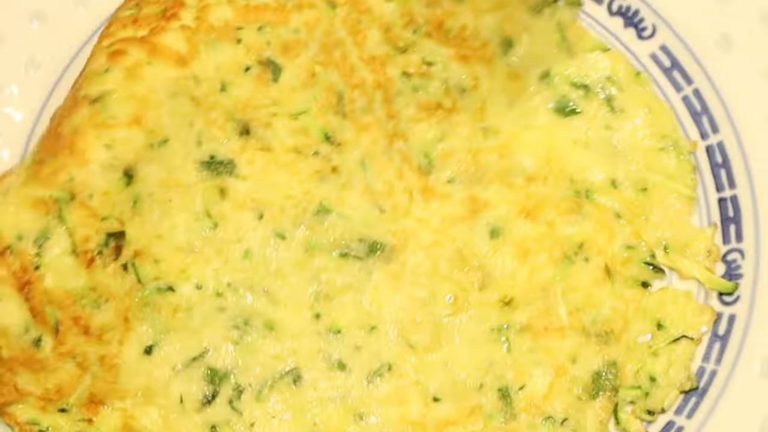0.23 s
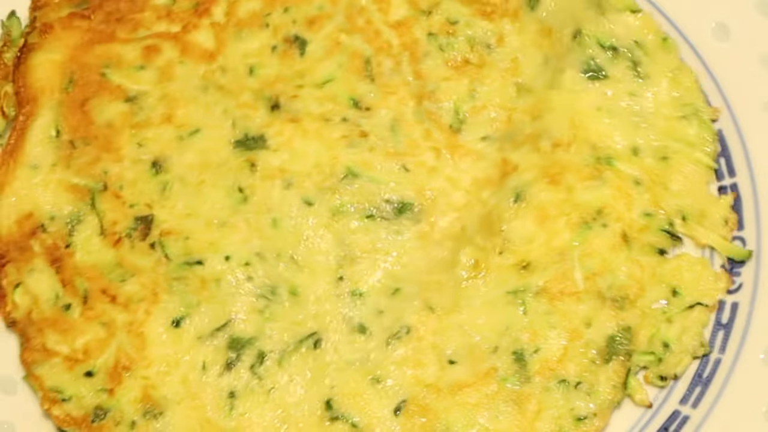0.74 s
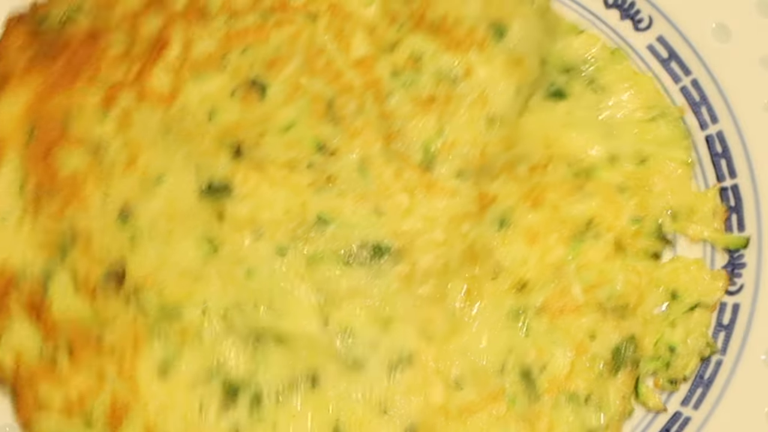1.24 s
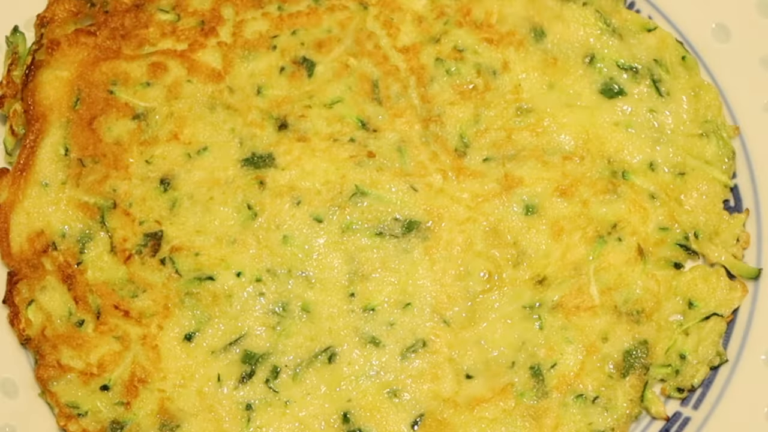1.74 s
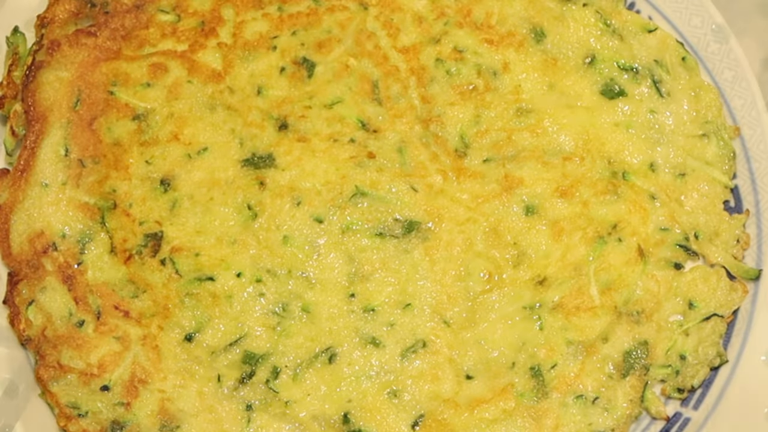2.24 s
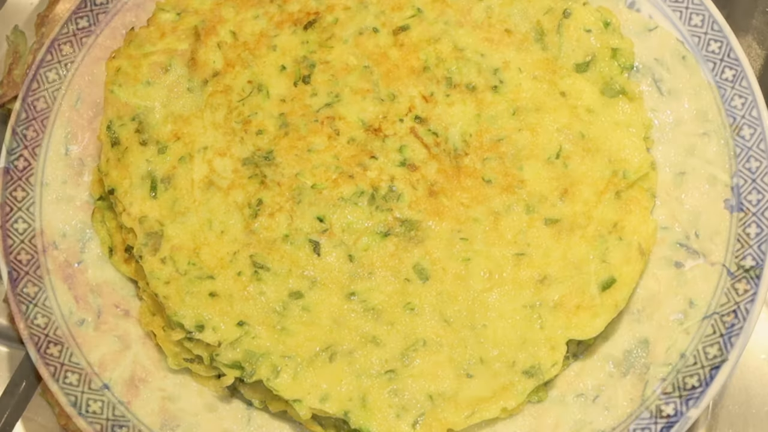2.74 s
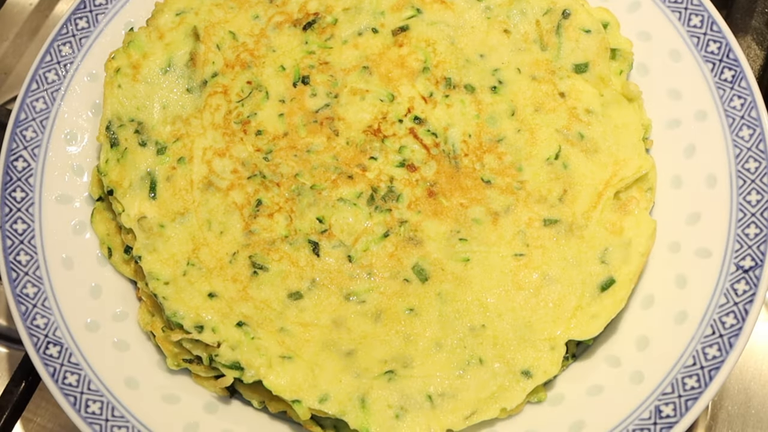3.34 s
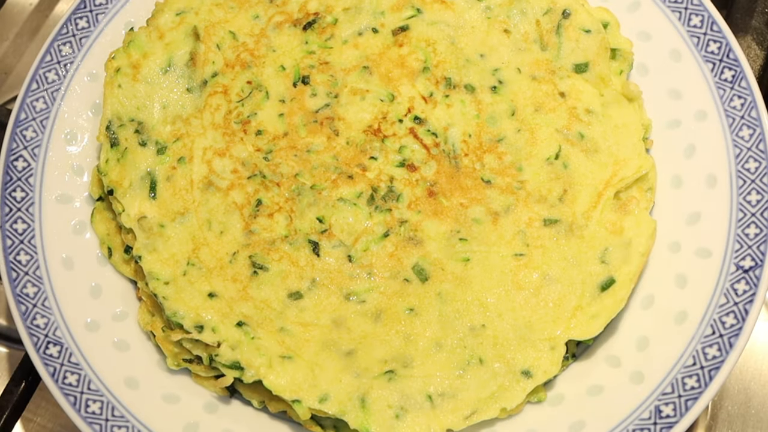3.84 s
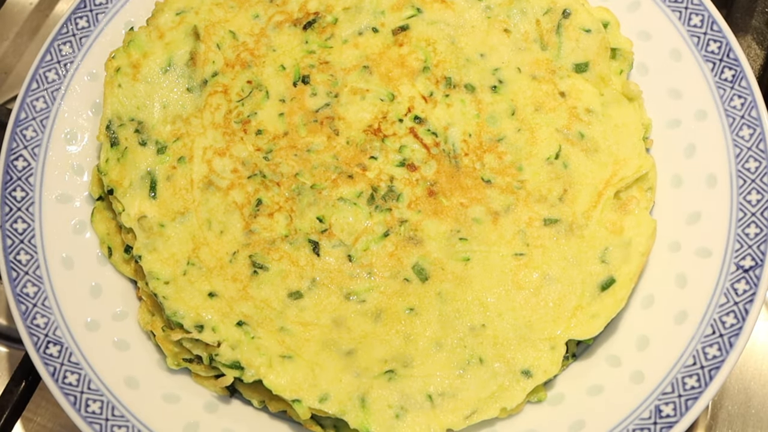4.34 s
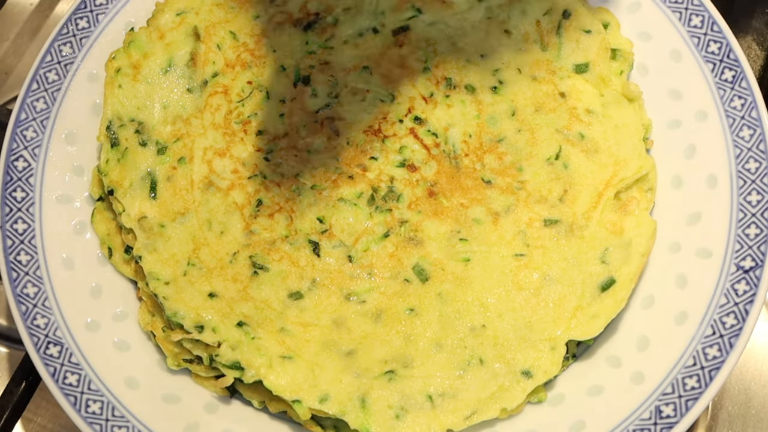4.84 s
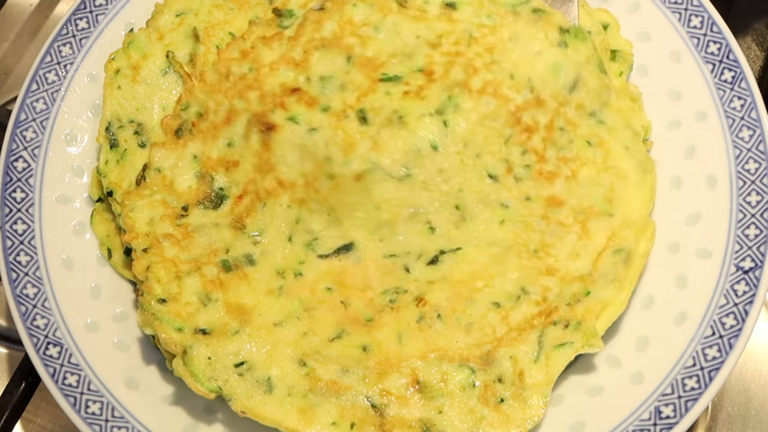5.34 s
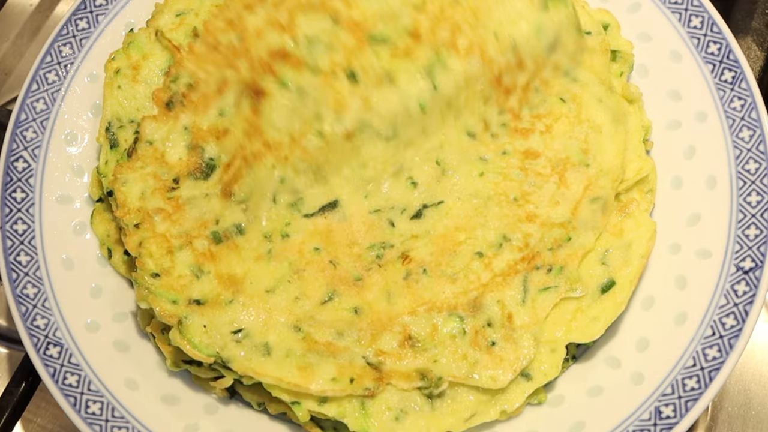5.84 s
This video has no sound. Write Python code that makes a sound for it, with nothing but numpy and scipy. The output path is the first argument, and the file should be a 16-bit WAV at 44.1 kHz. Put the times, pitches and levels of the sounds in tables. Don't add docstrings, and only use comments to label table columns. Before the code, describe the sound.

Close stereo pickup with a short room echo: metal blade on crockery, gritty and bright, with tiny chirps, ticks and a final hard scrape that rings away. Quiet follows, with a faint far creak. Then oil spits and bubbles, a heavy pan clanks and rocks on its grate, and the frying slowly dries up. Finally a soft wet mass smacks onto a plate, with a low thump beneath, leaving faint bubbling.

```python
import sys
import numpy as np
from scipy import signal
from scipy.fft import rfft, irfft, next_fast_len
from scipy.io import wavfile
from scipy.ndimage import uniform_filter1d, map_coordinates

SR = 44100
rng = np.random.default_rng(int(sys.argv[2]) if len(sys.argv) > 2 else 0)


def invert_db(level):
    return 10 ** (np.asarray(level, dtype=float) / 20)


def persist_wave(psi):
    counts = np.round(np.clip(psi, -1, 1) * 32767).astype(np.int16)
    wavfile.write(sys.argv[1], SR, np.atleast_2d(counts).T)


N = 268646
TIME = np.arange(N) / SR

BLADE_GROUPS = (2430, 4500, 9000)
# pitch in Hz, width in Hz, level in dB.
BLADE_PRESSED = [(2470, 240, 1.5), (3506, 250, -5), (4150, 70, -9.5), (5110, 60, -5.5), (5360, 92, -5),
                 (6500, 150, -7.5), (7000, 100, -9.5), (7320, 26, -6.5), (7810, 21, -7.5), (8940, 140, -10),
                 (10160, 150, -7.5), (11773, 570, -12.5), (13000, 260, -14.5), (15020, 165, -17)]
# pitch in Hz, width in Hz.
BLADE_VALLEYS = [(4650, 150), (6080, 350), (8350, 200), (9400, 450), (10850, 250), (13600, 300)]
# start in seconds, length in seconds, level in dB, low modes in dB, top modes in dB relative to it.
STROKES = [
    (0.403, 0.1, -58.5, 10, -5),
    (0.467, 0.15, -63, -3, -12),
    (0.542, 0.088, -50, -10, -14),
    (0.626, 0.048, -40.5, -5.5, -7.5),
    (0.955, 0.115, -54, -8.5, -9),
    (1.083, 0.13, -46.5, -4, -1),
    (1.5, .04, -70, -4, -3),
    (1.2185, 0.12, -46.5, -1, -3.5),
    (1.325, 0.14, -47, -2, -4),
    (0.046, 0.072, -58.5, 15.5, 6),
]
# start in seconds, length in seconds, level in dB, low modes in dB, top modes in dB relative to it.
JOLTS = [
    (0., 0.055, -56.5, -2, -5.5),
    (0.09, 0.73, -60.5, 14, -1),
    (0.65, 0.27, -51.5, -26, -11),
    (1.411, 0.11, -42.5, 2, 8),
    (1.506, 0.03, -50.5, 7.5, 6),
]
# peak time in seconds, level in dB, fall in dB per second.
SCUFFS = [
    (.018, -52, 150),
    (.06, -59.5, 170),
    (.645, -57.5, 226),
    (1.158, -53.5, 500),
    (1.425, -49, 300),
    (1.515, -52, 330),
]
# start in seconds, peak in dB, tilt in dB per octave.
TICKS = [(0.0136, -36, -13), (.021, -49, -5), (.034, -45, -9), (0.045, -47, -12), (.422, -65, 3.5),
         (0.438, -52.5, 2.5), (.495, -47, 0.5), (.578, -46, -2.5), (0.593, -43.5, 3), (.626, -51.5, -4),
         (.9512, -66, -10), (.979, -54.5, -2.5), (.996, -47, 6), (1.086, -52.5, -4.5), (1.156, -34, -0.5),
         (1.161, -39, 3), (1.234, -42, 1.5), (1.263, -43.5, -3.5), (1.303, -41.5, 0), (1.346, -51, 3),
         (1.377, -44.5, 1.5), (1.4175, -27.5, 1.5), (1.425, -33, 2.5), (1.4295, -28, 0.5), (1.432, -35, 0),
         (1.497, -41.5, -3.5), (1.5065, -31.5, -6), (1.517, -37.5, 2)]
# start in seconds, peak in dB, length in ms.
SLIPS = [(0.4226, -42.5, 3.5), (0.428, -44, 1.7), (0.432, -52.5, 3), (0.438, -41, 2.4), (0.4418, -34, 2.3),
         (0.4466, -42.5, 2.6), (0.47, -45, 3.4), (0.488, -43.5, 2.4), (0.493, -45.5, 3.6), (.51, -56, 3.5),
         (0.5273, -46, 4), (0.539, -43.5, 2.3), (0.5473, -31.5, 5.4), (0.55, -42.5, 4.6),
         (0.5557, -46.5, 4.4), (0.5669, -43.5, 3.1), (0.5714, -46.5, 3.5), (0.5776, -34, 5.1),
         (0.5837, -37.5, 2.2), (1.4166, -32, 3.5), (1.4305, -39, 1.9), (1.439, -34.5, 1.9),
         (1.4449, -31, 2.5), (1.45, -39.5, 4.4), (1.4717, -35.5, 5)]
# start in seconds, peak in dB, pitch in Hz.
BITES = [
    (0.637, -42, 5450),
    (0.643, -37, 5420),
    (.652, -42.5, 5440),
    (0.657, -49.5, 5310),
    (0.9512, -65, 5110),
    (0.9785, -54, 3440),
    (1.088, -40.5, 5360),
    (1.156, -43, 4150),
    (1.418, -32.5, 4970),
    (1.5045, -41, 3600),
]
# start in seconds, peak in dB, pitch in Hz, length in ms.
PLATE_NUDGES = [
    (0.015, -38.5, 900, 1.5),
    (0.02, -53, 940, 3.7),
    (0.035, -40, 920, 2.1),
    (0.593, -48, 1060, 1.6),
    (0.598, -67, 816, 20),
    (1.304, -64.5, 830, 5.5),
    (1.439, -49.5, 1115, 5.7),
    (1.482, -51.5, 1077, 7.4),
]
# pitch in Hz, width in Hz, level in dB.
PLATE_HUM = [(720, 90, 0.5), (790, 40, -4.5), (1760, 200, 3)]
# start in seconds, level in dB under 300 Hz, near 700 Hz, near 2 kHz
# and above 4 kHz, contact in ms.
TAPS = [
    (.072, -61, -36, -35, -64, 20),
    (.652, -60, -36.5, -50.5, -62, 8.2),
    (1.507, -38.5, -28, -41, -45.5, 26.6),
]
# pitch in Hz, level in dB, time to fade 60 dB in seconds.
BLADE_FREE = [(720, -15, 0.29), (671, -8.5, 0.078), (238, -28.5, 0.74), (2054, -7, 0.91),
              (2332, -11.5, 0.63), (2690, -12.5, 0.082), (2837, 1, 0.17), (3714, 1, 0.24), (5100, 7, 0.07),
              (6160, -1, .09), (7000, -7.5, 0.12), (7670, -16.5, .17), (12770, -10, 0.2),
              (13910, -10.5, 0.1)]
# start in seconds, level in dB under 300 Hz, near 700 Hz, near 2 kHz
# and above 4 kHz, contact in ms.
DABS = [
    (.0135, -81, -55, -57, -61, 1.2),
    (.0205, -66, -57, -54, -74, 1),
    (.0335, -67, -47.5, -52, -69.5, 1.9),
    (.8162, -45, -44.5, -44.5, -44.5, 0.3),
]
# pitch in Hz, level in dB, time to fade 60 dB in seconds.
BLADE_DOWN = [(197, -14, 0.18), (674, 0.5, 0.13), (844, -1.5, 0.15), (1257, -28, 0.11), (1600, -8.5, 0.033),
              (1830, -6.5, 0.049), (2360, 3.5, 0.092), (3420, 4, 0.023), (5300, -7, 0.084),
              (7100, -12.5, 0.037)]
# start in seconds, level in dB under 300 Hz, near 700 Hz, near 2 kHz
# and above 4 kHz, contact in ms.
DROPS = [
    (.63, -60, -36.5, -33, -66.5, 36),
    (.654, -49.5, -32, -44, -63.5, 15),
]
# pitch in Hz, level in dB, time to fade 60 dB in seconds.
PLATE_LOADED = [(186, -8.5, 0.54), (246, -5, 0.29), (329, -5.5, 0.32), (483, -11.5, 0.28),
                (626, -10.5, 0.22), (708, -3, 0.29), (761, -12.5, 0.32), (880, -12.5, 0.067),
                (1148, -14.5, .15)]
# start in seconds, level in dB under 300 Hz, near 700 Hz, near 2 kHz
# and above 4 kHz, contact in ms.
SPRINGS = [
    (.045, -90, -88.5, -53, -49.5, 25.2),
]
# pitch in Hz, level in dB, time to fade 60 dB in seconds.
SHIMMER = [(4200, -12, .35), (5600, -3.5, 0.22), (7380, -7, .12), (9240, 0, 0.16), (9900, -6, .12),
           (11070, -15.5, .15), (12900, 3, .14), (13340, 3, .14), (12770, -11, .4), (15230, -2.5, .1),
           (15700, -14.5, .1)]

# pitch in Hz, level in dB per Hz.
HUSH = [(30, -44.5), (214, -6.5), (700, -27), (1080, -40.5), (2500, -34), (6770, -21), (7320, -24),
        (15600, -23.5)]
# pitch in Hz, width in Hz, level in dB.
HOLLOW_MODES = [(520, 130, 0), (640, 70, 0)]
# peak time in seconds, level in dB, fall in dB per second, pitch in Hz.
CREAKS = [
    (1.916, -79.5, 397.5, 1423),
    (2.05, -74, 178.5, 1359),
]

# peak time in seconds, level in dB, fall in dB per second.
BOOMS = [
    (.645, -58, 99),
    (1.53, -64, 259),
    (2.89, -51, 171.5),
    (3.27, -74.5, 28),
    (4.43, -63, 133),
    (5.122, -33.5, 337),
    (5.15, -67.5, 76),
    (5.778, -70, 32),
]
# peak time in seconds, level in dB, fall in dB per second.
PUSHES = [
    (.114, -57.5, 352),
    (2.39, -72.5, 110),
    (2.69, -63.5, 402),
    (3.92, -69.5, 250),
    (4.18, -65, 334),
    (4.88, -76, 150),
    (5.55, -76, 149.2),
]
# pitch in Hz, width in Hz, level in dB.
COUNTER_MODES = [(98, 30, -25), (157, 120, -6), (210, 55, 5), (299, 120, -10.5)]

# time in seconds, bubbling in dB.
FRY = [(2.15, -109), (2.28, -77), (2.394, -67.5), (2.75, -50.5), (2.95, -51), (3.3, -53), (3.43, -56.5),
       (3.76, -53.5), (3.84, -56.5), (4.21, -57), (4.74, -62.5), (4.81, -65), (5.06, -65), (5.38, -74.5),
       (5.45, -64.5), (5.86, -71.5), (6.09, -71)]
# pitch in Hz, level in dB per Hz.
FRY_COLOUR = [(1500, -30.5), (2000, -9), (2750, -10), (3610, 1.5), (4090, 4.5), (7240, -0.5), (10200, -9.5),
              (15600, -12)]
# peak time in seconds, bubbling in dB, spray in dB, fall in dB per second.
FLARES = [
    (3.369, -50.5, -49.5, 159),
    (4.249, -56, -62, 157),
    (4.36, -61.5, -73.5, 51),
    (4.87, -58.5, -73, 358),
    (5.17, -63.5, -80, 49.5),
    (5.93, -56, -70, 71),
    (6.011, -71.5, -71.5, 156.5),
]
# start in seconds, peak in dB, pitch in Hz, cycles.
BUBBLES = [
    (4.148, -46, 3240, 25.4),
    (4.7093, -54.5, 5230, 34),
    (4.8616, -47, 5400, 68),
    (4.971, -47.5, 4020, 25),
    (5.261, -58.5, 4170, 68),
    (5.9332, -36, 3720, 11),
]
# start in seconds, peak in dB, pitch in Hz, cycles.
SPITS = [
    (3.0402, -36, 7000, 2.2),
    (3.3564, -35.5, 10500, 2.5),
    (3.363, -26.5, 10500, 2.8),
    (2.742, -38.5, 11000, 2.9),
    (4.097, -38, 6000, 7.2),
    (4.116, -33, 9000, 2.5),
    (4.3625, -40.5, 11000, 3),
    (5.4575, -45.5, 12000, 13.5),
]
# start in seconds, peak in dB, centre in Hz, fade in ms.
SPLUTTERS = [(3.12, -42, 3000, 27), (3.3, -45, 4000, 31), (2.689, -48, 3300, 60), (3.678, -44, 7000, 31),
             (3.705, -45, 8350, 21), (3.85, -43.5, 12100, 24), (3.883, -45, 11100, 14),
             (3.907, -45.5, 4120, 44), (3.973, -41.5, 7400, 15), (4.0356, -39.5, 4760, 58),
             (4.116, -41, 7500, 13.4), (4.148, -42, 3260, 24), (4.179, -37, 4760, 15.3),
             (4.24, -49, 11370, 12), (4.3193, -38, 4300, 28), (4.329, -44.5, 7000, 12),
             (4.417, -41.5, 5300, 52), (4.419, -48.5, 7300, 63), (4.489, -48.5, 4000, 110),
             (4.54, -47, 5230, 14.5), (4.584, -50, 3035, 45), (4.617, -43, 4100, 88),
             (4.629, -51.5, 2500, 36), (4.7073, -36.5, 5100, 23), (4.817, -48, 2500, 22.5),
             (5.93, -46.5, 3650, 100), (3.71, -52, 13600, 23), (4.361, -47, 13000, 11),
             (4.472, -50.5, 13000, 25), (4.86, -50.5, 6500, 24), (5.971, -49.5, 6060, 40),
             (6.01, -49, 4330, 27)]

# time in seconds, level in dB.
SHUFFLE = [(2.2, -120), (2.26, -85), (2.35, -68), (2.5, -73.5), (2.84, -67), (3.08, -64), (3.23, -75.5),
           (3.8, -67.5), (4.24, -76.5), (5.05, -74.5), (5.36, -76.5), (6.09, -76)]
# pitch in Hz, width in Hz, level in dB.
SHUFFLE_MODES = [
    [(484, 66, -5), (578, 87, 4.5), (756, 56, -4)],
    [(1022, 110, 12.5), (1110, 34, 0)],
    [(1780, 130, -5), (1930, 640, 10)],
]
# peak time in seconds, level in dB, fall in dB per second.
SKIDS = [
    (3.77, -57.5, 129),
]
# start in seconds, peak in dB, pitch in Hz, length in ms.
ROCKS = [
    (2.699, -53.5, 652, 22),
    (3.708, -50.5, 684, 12.4),
    (3.813, -38.5, 657, 15.5),
    (3.871, -44.5, 750, 4.4),
    (3.945, -44, 677, 13),
    (4.013, -44, 652, 11),
    (4.409, -42, 1070, 10),
    (4.424, -44, 1060, 15),
    (4.445, -41, 674, 8.9),
    (4.456, -47.5, 668, 6.5),
]
# start in seconds, level in dB under 300 Hz, near 700 Hz, near 2 kHz
# and above 4 kHz, contact in ms.
KNOCKS = [
    (2.272, -87, -74.5, -82, -75, 2.4),
    (2.864, -52, -18.5, -27, -28, 1),
    (2.931, -31, -49, -43.5, -51.5, 17),
]
# pitch in Hz, level in dB, time to fade 60 dB in seconds.
SKILLET = [(605.4, 4, 0.1), (623, 8.5, 0.11), (721, 2.5, 0.079), (950, -5, 0.075), (1018.5, -5.5, 0.082),
           (787, -8, 0.11), (1116, -8.5, 0.23), (1510, -6, 0.035), (1677, -13.5, 0.52), (1786, -7.5, 0.27),
           (1886, 5, 0.098), (2060, -8.5, 0.29), (2470, -9.5, .1), (2924, -4, 0.11)]
# start in seconds, level in dB under 300 Hz, near 700 Hz, near 2 kHz
# and above 4 kHz, contact in ms.
RIM_KNOCKS = [
    (2.864, -89, -59.5, -46, -38.5, 1.3),
]
# pitch in Hz, level in dB, time to fade 60 dB in seconds.
SKILLET_RIM = [(4100, 1.5, 0.1507), (3990, 0.5, 0.19), (3990, -1.5, 0.2), (4420, -4.5, 0.19),
               (4560, -3, 0.17), (4678, -5, 0.39), (5460, -3, 0.16), (7300, -6, 0.075)]
# start in seconds, level in dB under 300 Hz, near 700 Hz, near 2 kHz
# and above 4 kHz, contact in ms.
GRATE_BUMPS = [
    (2.336, -57, -51, -61.5, -58, 33.5),
]
# pitch in Hz, level in dB, time to fade 60 dB in seconds.
GRATE = [(306.4, -0.5, 0.65), (688.2, -2, 0.69), (970, 6.5, 0.17), (1933, 6.5, 0.29)]

# start in seconds, level in dB under 300 Hz, near 700 Hz, near 2 kHz
# and above 4 kHz, contact in ms.
SLAPS = [
    (5.064, -89, -52.5, -38.5, -46.5, 11),
    (5.083, -71.5, -36, -25.5, -32, 4.3),
    (5.108, -20.5, -32, -39, -42, 30),
]
# pitch in Hz, level in dB, time to fade 60 dB in seconds.
PLATE = [(222.6, -15, 0.2), (435.7, -17, 0.13), (628, -2, 0.38), (846, 1.5, 0.074), (1060, -26, 0.201),
         (1620, -22, 0.12), (1960, -20, 0.08), (2500, -17, 0.062)]
# pitch in Hz, level in dB per Hz.
SLAP_AIR = [(88, -47.5), (150, -14.5), (1570, -1.5), (2650, -34.5), (3910, -21), (6110, -28), (9000, -30),
            (15500, -38.5)]
# start in seconds, peak in dB, fade in ms.
SLAP_CRACKS = [
    (5.071, -46, 4.6),
    (5.081, -28.5, 5.87),
    (5.086, -19.5, 4.2),
    (5.091, -22.5, 7),
    (5.105, -27, 4.38),
]
# time in seconds, left over right in dB.
SLAP_PAN = [
    (5.07, -8.5),
    (5.1, 15),
    (5.125, 8.5),
    (5.2, 17),
]
# pitch in Hz, time to fade 60 dB in seconds.
ROOM_T60 = [(200, .45), (1500, 0.26), (12000, 0.056)]


def unit(x):
    return x / np.sqrt(np.mean(x ** 2))


def steady(x, seconds):
    return x / np.sqrt(uniform_filter1d(x ** 2, int(seconds * SR)) + 1e-12)


def on_log(hz, table):
    points, values = np.transpose(table)
    return np.interp(np.log(hz), np.log(points), values)


def curve(table):
    return np.interp(TIME, *np.transpose(table))


def colour(x, table):
    size = next_fast_len(len(x))
    gain = invert_db(on_log(np.fft.rfftfreq(size, 1 / SR) + 1, table))
    return irfft(rfft(x, size) * gain, size)[:len(x)]


def high_pass(x, order, hz):
    return signal.sosfilt(signal.butter(order, hz, "high", fs=SR, output="sos"), x)


def resonate(x, hz, width):
    return signal.lfilter(*signal.iirpeak(hz, hz / width, SR), x)


def walk(rate):
    k = int(SR / rate)
    held = np.repeat(rng.standard_normal(N // k + 1), k)
    return 0.88 * uniform_filter1d(uniform_filter1d(held, k), k)[:N]


def bend(x, share, rate=11):
    return map_coordinates(x, [np.arange(N) + np.cumsum(share * walk(rate))], mode="mirror")


def grit(rate, spread_db):
    size = invert_db(spread_db * rng.exponential(size=N)) * rng.standard_normal(N)
    return unit(size * (rng.random(N) < rate / SR))


def add(out, s, sound):
    i = int(s * SR)
    out[i:i + len(sound)] += sound[:N - i]


def place(x, pan_db):
    left = invert_db(pan_db)
    return 2 * x * np.array([left + 0 * x, 1 + 0 * x]) / (1 + left)


def swells(events, rise_db_s, under_db):
    peaks = [db - np.where(TIME < s, rise_db_s * (s - TIME), fall * (TIME - s)) for s, db, fall in events]
    return np.max(peaks + [under_db + 0 * TIME], axis=0)


def shake(contact, modes, skirt, patchy_db):
    out = 0
    for hz, width, db in modes:
        mode = unit(resonate(resonate(contact, hz, skirt * width), hz, width))
        out = out + invert_db(db + patchy_db * walk(14)) * mode
    return steady(out, 0.1)


def strike(blows, modes, rattle_db, rattle_s, beat_hz, depth, cut_hz=190):
    out, t = np.zeros(N), TIME[:SR // 2, None]
    hz, db, t60 = np.transpose(modes)
    for s, low_db, body_db, mid_db, top_db, ms in blows:
        gain = invert_db(db + on_log(hz, [(280, low_db), (700, body_db), (2100, mid_db), (3500, top_db)]))
        rise = (1 - np.exp(-t * 4000 / ms)) ** 2
        phase, apart = rng.random((2, len(hz)))
        waver = 1 + depth * np.cos(2 * np.pi * beat_hz * (.5 + apart) * t)
        tones = np.sin(2 * np.pi * (hz * t + 0.18 * phase + np.arange(len(hz)) / 2))
        ring = rise * gain * waver * tones * 1000. ** (-t / t60)
        rattle_colour = [(150, low_db - 24.5), (700, body_db), (2100, mid_db - 5),
                         (5000, top_db - 15.0), (15000, top_db - 52.0)]
        rattle = unit(colour(rng.standard_normal(len(t)), rattle_colour))
        fade = (rise * 1000. ** (-t / (rattle_s + ms / 300)))[:, 0]
        add(out, s, ring.sum(1) + invert_db(max(body_db, mid_db) + rattle_db) * rattle * fade)
    return high_pass(out, 8, cut_hz)


def blips(events, glide):
    out = np.zeros(N)
    for s, db, hz, seconds in events:
        u = np.linspace(0, 1, int(seconds * SR) + 2)
        tone = np.sin(2 * np.pi * hz * seconds * (u + glide * u ** 2 / 2))
        add(out, s - .001, invert_db(db) * np.sin(np.pi * np.sqrt(u)) ** 2 * tone)
    return out


def kitchen(x, wet_db, pan_db):
    t, echo = TIME[:SR // 2], 0
    for hz in 125 * 2. ** np.arange(8):
        noise = resonate(rng.standard_normal((2, len(t))), hz, hz * 0.46)
        echo = echo + noise * 1000. ** (-t / on_log(hz, ROOM_T60)) * (1 - np.exp(-t / 0.003))
    echo = echo / np.sqrt(np.sum(echo ** 2) / 2)
    shared, apart = invert_db(wet_db) * signal.fftconvolve(x[None], echo, axes=1)[:, :N]
    return place(x + shared, pan_db) + colour(apart, [(2000, -15.5), (12000, -1.5)]) * np.array([[1], [-1]])


def dragging():
    land_s, lift_s = 0.0065, 0.029
    levels = np.full((3, N), -110.)
    shapes = [(row, row[1] * 0.51, -8.5, [-28] * 3) for row in STROKES]
    shapes += [(row, 0.008, -1, -row[1] * np.array((134.5, 192, 297))) for row in JOLTS]
    for (s, length, db, low_db, top_db), rise_s, start_db, ends_db in shapes:
        times = [-land_s, 0, rise_s, length, length + lift_s]
        for level, share_db, end_db in zip(levels, (low_db, 0, top_db), ends_db):
            shape = np.interp(TIME - s, times, [-40, start_db, 0, end_db, end_db - 35], -99, -99)
            add(level, 0, np.maximum(db + share_db + shape - level, 0))
    return levels


def chatter(levels):
    nearest = [np.argmin(abs(np.log(row[0] / np.array(BLADE_GROUPS)))) for row in BLADE_PRESSED]
    out = 0
    for group, db in enumerate(levels):
        contact = grit(7000, 1.8) * invert_db(3.5 * walk(70))
        modes = [row for row, k in zip(BLADE_PRESSED, nearest) if k == group]
        out = out + bend(shake(contact, modes, 3, 6), .012) * invert_db(db - 3.0)
    return out


def ticks():
    out, t = np.zeros(N), TIME[:SR // 20, None]
    hz, width, db = np.transpose(BLADE_PRESSED)
    damping, crack_s, crack_db = 1.4, .0008, -13
    for s, peak_db, tilt_db in TICKS:
        mix_db = db + tilt_db * 2 * np.log2(hz / 4000) + 4 * rng.standard_normal(len(hz))
        ring = (invert_db(mix_db) * np.sin(2 * np.pi * hz * t) * np.exp(-np.pi * damping * width * t)).sum(1)
        crack = rng.standard_normal(len(t)) * np.exp(-t[:, 0] / crack_s)
        add(out, s, invert_db(peak_db) * (ring / abs(ring).max() + invert_db(crack_db) * resonate(crack, 6000, 8000)))
    return out


def scrape():
    levels = dragging()
    scuff = grit(9000, 1.8)
    rasp = unit(colour(scuff, [(1500, -30.0), (3000, 4.0), (8000, 1), (15000, -7.5)]))
    rasp = rasp * invert_db(swells(SCUFFS, 500, levels[2] - 17))
    scraped = high_pass(chatter(levels) + rasp + ticks(), 4, 1750)
    for hz, width in BLADE_VALLEYS:
        scraped = scraped - resonate(scraped, hz, width)
    return scraped + shake(scuff, PLATE_HUM, 2.2, 4) * invert_db(levels[1] - 27)


def slips():
    events = [(s, db, 2402, ms) for s, db, ms in SLIPS] + PLATE_NUDGES + [(*row, 2.1) for row in BITES]
    return blips([(s, db, hz, 3.1 * ms / 1000) for s, db, hz, ms in events], 0)


def free_ring():
    pressed = uniform_filter1d(1. * (TIME > .814) * (TIME < 1.503), size=200)
    held_db = -16 * pressed - 118.5 * np.maximum(TIME - 1.546, 0)
    return strike(TAPS, BLADE_FREE, -11.0, 0.0054, 16, 0.04) * invert_db(held_db)


def spatula():
    dabs = strike(DABS, BLADE_DOWN, -2, 0.071, 27, 0.24)
    drops = strike(DROPS, PLATE_LOADED, -16, 0.0497, 10.0, 0.2, cut_hz=110)
    springs = strike(SPRINGS, SHIMMER, -11.5, .05, 30, .3)
    return scrape() + slips() + free_ring() + dabs + drops + springs


def background():
    hush = invert_db(-90) * np.array([unit(colour(rng.standard_normal(N), HUSH)) for _ in range(2)])
    hollow_db = -76.5 - 8 * TIME - 50 * np.maximum(TIME - 1.82, 0)
    hollow = invert_db(np.maximum(hollow_db, -100)) * shake(rng.standard_normal(N), HOLLOW_MODES, 1.0, 2.9)
    wobble = 1 + 0.48 * unit(resonate(rng.standard_normal(N), 53, 50))
    creak, sag_hz_s = 0, 198.6
    for s, db, fall, hz in CREAKS:
        since = TIME - s
        phase = 2 * np.pi * (hz - sag_hz_s * since / 2) * since + 1.7 * walk(70)
        creak = creak + invert_db(swells([(s, db, fall)], 311, -150)) * np.sin(phase)
    apart = 0.39 * hush[1] * np.array([[1], [-1]])
    return place(hush[0], 8) + place(hollow, 25) + apart + place(wobble * creak, 15.0)


def counter():
    pushes_db = swells(PUSHES, 201.5, curve(SHUFFLE) - 11.5)
    return invert_db(swells(BOOMS, 798.5, pushes_db)) * shake(rng.standard_normal(N), COUNTER_MODES, 3, 2.5)


def splutters():
    out, t = np.zeros(N), TIME[:SR // 4]
    for s, db, hz, ms in SPLUTTERS:
        pocket = unit(resonate(resonate(rng.standard_normal(len(t)), hz, hz / 3), hz, hz / 3))
        pocket = pocket * invert_db(5.6 * walk(140)[:len(t)])
        add(out, s, invert_db(db - 8.0) * pocket * (1 - np.exp(-t / 0.011)) * np.exp(-t * 1000 / ms))
    return out


def sizzle():
    fry_db, flares = curve(FRY), np.array(FLARES)
    dries_s, rest_db, flare_rise_db_s = 3.8, -77, 208
    mist_db = fry_db - 4 - 23.5 * np.maximum(TIME - dries_s, 0)
    mist_db = np.where(TIME > dries_s, np.maximum(mist_db, rest_db), mist_db)
    bubbling_db = swells(flares[:, [0, 1, 3]], flare_rise_db_s, fry_db)
    spray_db = swells(flares[:, [0, 2, 3]], flare_rise_db_s, mist_db)
    swell, bubbling, spray = walk(31), np.zeros(N), np.zeros(N)
    for hz in 1400 * 2 ** np.arange(0, 3.55, .17):
        band = unit(resonate(resonate(grit(5000, 1.5), hz, hz / 7), hz, hz / 7))
        chirps = sum(unit(resonate(band, f, f / 30)) * invert_db(4 * walk(25))
                     for f in hz * 2 ** rng.uniform(-.08, .08, 2))
        band = band + invert_db(-6) * chirps
        flicker_db = 2.9 * swell + 0.5 * walk(9.5) + 2.0 * walk(90)
        swarm = band * invert_db(on_log(hz, FRY_COLOUR) + 10 * np.log10(hz) + flicker_db)
        fine = np.clip(.5 + 1.4 * np.log2(hz / 8400), 0, 1)
        bubbling += np.sqrt(1 - fine) * swarm
        spray += np.sqrt(fine) * swarm
    bubbling = steady(bend(bubbling, .07), 0.21) * invert_db(bubbling_db)
    spray = steady(bend(spray, .07), 0.046) * invert_db(spray_db)
    singles = blips([(s, db, hz, cycles / hz) for s, db, hz, cycles in BUBBLES + SPITS], 0.017)
    return bubbling + spray + singles + splutters()


def shuffle():
    body_db, second_db, rim_db = (curve(SHUFFLE) + db for db in (-0.5, -4, -4.5))
    shaken = 0
    for modes, db in zip(SHUFFLE_MODES, (body_db, second_db, swells(SKIDS, 117, rim_db))):
        contact = grit(1700, 1.4) * invert_db(7.1 * walk(38))
        shaken = shaken + invert_db(db) * shake(contact, modes, 5, 5.5)
    return shaken + blips([(s, db, hz, ms / 1000) for s, db, hz, ms in ROCKS], 0)


def knocks():
    body = strike(KNOCKS, SKILLET, -3.5, 0.07, 23, 0.3, cut_hz=473)
    rim = strike(RIM_KNOCKS, SKILLET_RIM, -2.5, .08, 26, .2, cut_hz=1500)
    return body + rim + strike(GRATE_BUMPS, GRATE, 0, 0.087, 20, 0.37)


def slap():
    air, t, noise = np.zeros(N), TIME[:SR // 8], rng.standard_normal(N)
    for s, db, ms in SLAP_CRACKS:
        add(air, s + 0.00092, invert_db(db) * (0.434 * np.exp(-t / .0018) + 0.15 * np.exp(-t * 1000 / ms)))
    cracks = colour(air * noise, SLAP_AIR) / np.std(colour(noise, SLAP_AIR))
    stilled_db = -250 * np.maximum(TIME - 5.29, 0)
    return cracks + strike(SLAPS, PLATE, -2.2, 0.075, 12, 0.15) * invert_db(stilled_db)


def scene():
    oil_pan_db = np.interp(TIME, [2.9, 3.4], [12, 17])
    out = kitchen(spatula(), -13.0, 13.0) + background() + kitchen(counter(), -16.0, 9.1)
    out = out + kitchen(sizzle(), -12.5, oil_pan_db) + kitchen(shuffle(), -9.5, 18)
    return out + kitchen(knocks(), -18, 10.0) + kitchen(slap(), -12.0, curve(SLAP_PAN))


def low_pass(x):
    return signal.sosfilt(signal.butter(12, 15800, fs=SR, output="sos"), x)


def record(dry):
    mid, side = (dry[0] + dry[1]) / 2, (dry[0] - dry[1]) / 2
    side = high_pass(side, 2, 250)
    miked = high_pass(np.array([mid + side, mid - side]), 2, 80)
    miked = signal.sosfilt(signal.ellip(10, .2, 70, 15720, fs=SR, output="sos"), miked)
    return low_pass(miked)


dry = scene()
out = record(dry)
persist_wave(out)
```